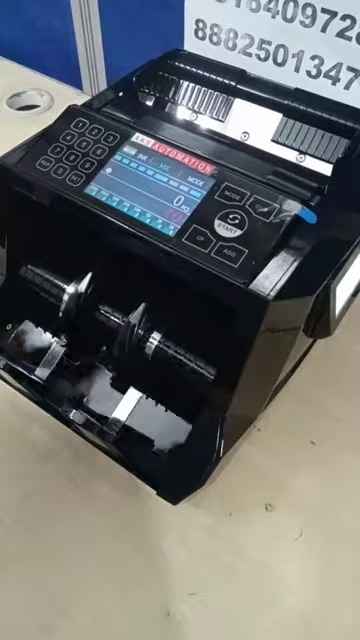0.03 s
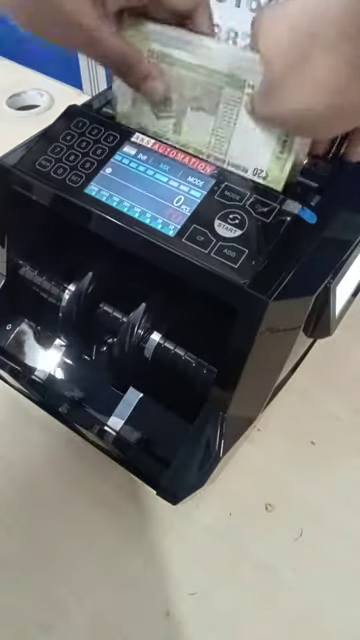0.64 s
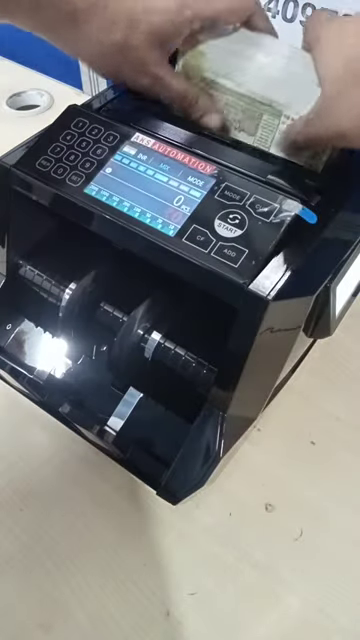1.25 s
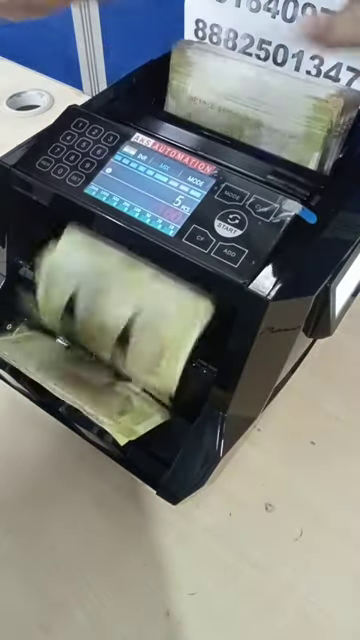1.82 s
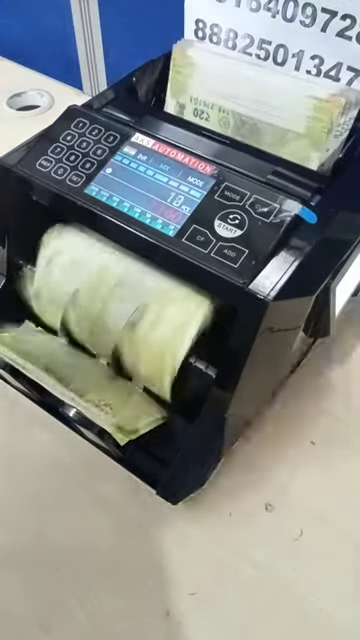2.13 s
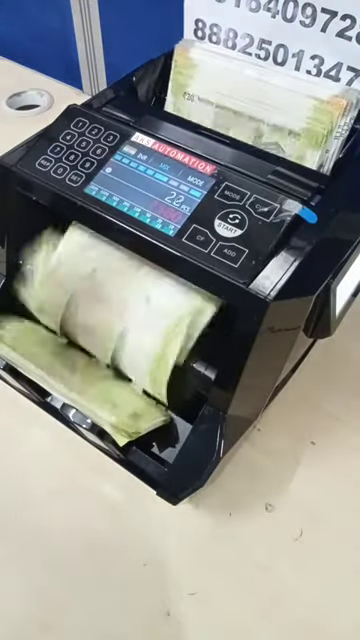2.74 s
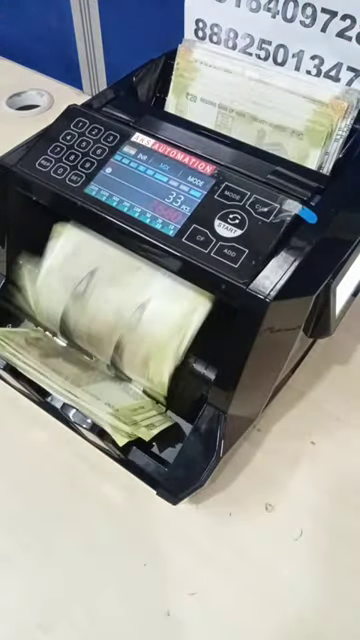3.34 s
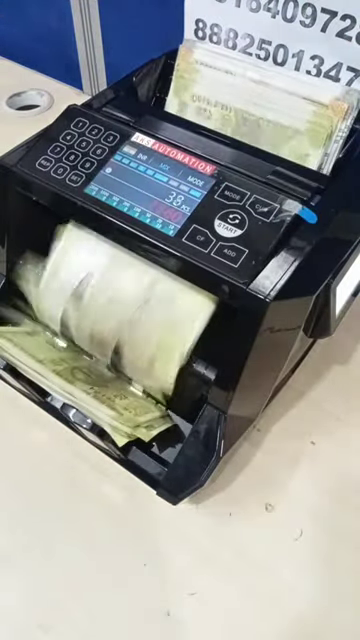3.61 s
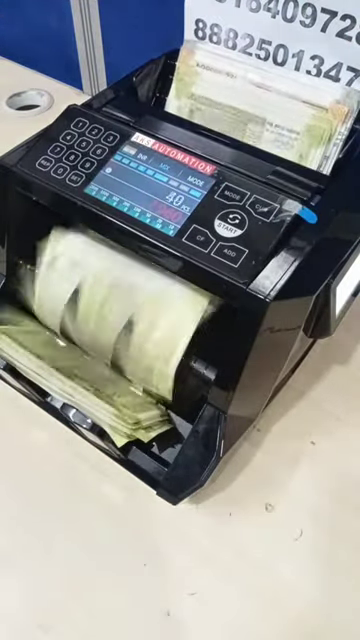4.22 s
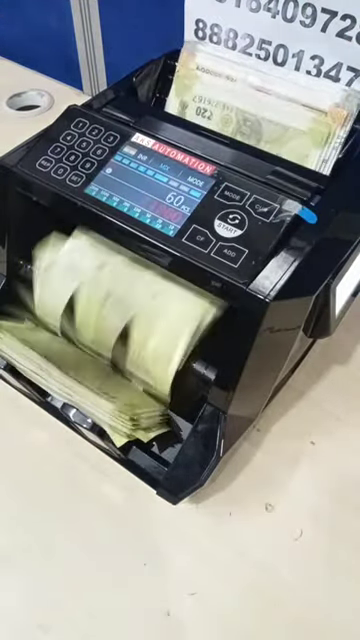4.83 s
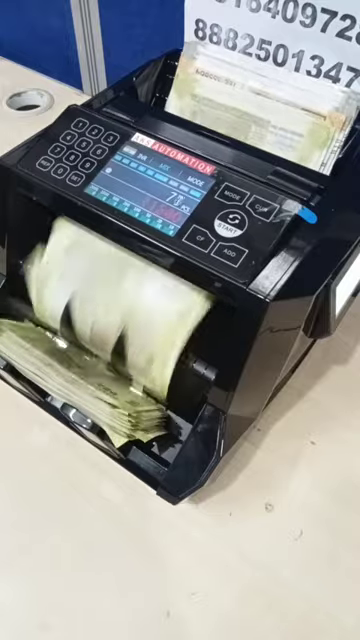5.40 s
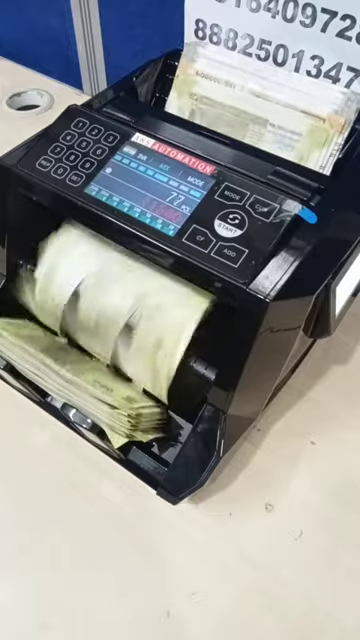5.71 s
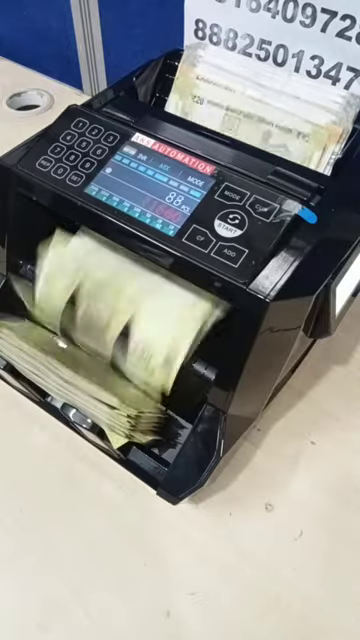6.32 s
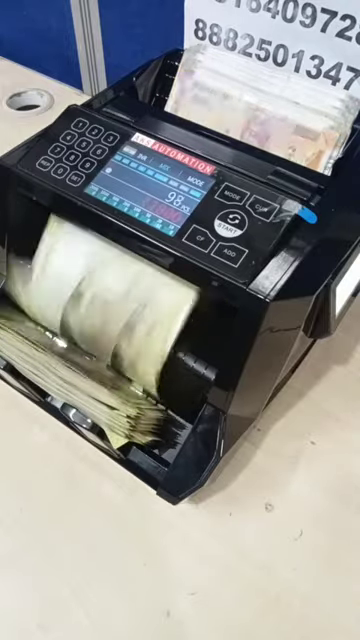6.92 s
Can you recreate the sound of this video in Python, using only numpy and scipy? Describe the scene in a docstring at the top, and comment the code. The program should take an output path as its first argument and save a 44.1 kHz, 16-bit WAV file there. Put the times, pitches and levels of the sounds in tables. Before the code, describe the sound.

Close to a banknote counter on a desk in a small office, fans rush softly. A bundle of notes knocks against the hopper and slides in with a faint rub. The motor starts with a short hiss and pulls the notes through in a rapid flutter of snaps and rustles, over a low hum and a rattling drive. It shudders at first, then runs evenly to the end.

```python
"""A small office, close to a banknote counter on the desk, with fans rushing softly in the room.
A bundle is knocked against the hopper and slid in; then the motor starts and pulls about 18 notes a second.
Each note snaps taut in the rollers, rustles along the path and slaps onto the stack, over mains hum
and the rattle of the drive. The full bundle shudders at first, then the feed runs on evenly."""
import sys
import numpy as np
from scipy import signal
from scipy.fft import rfft, irfft
from scipy.io import wavfile
from scipy.ndimage import uniform_filter1d

SR = 44100
rng = np.random.default_rng(int(sys.argv[2]) if len(sys.argv) > 2 else 0)


def unload_audio(sound):
    """Save the sound as a 16-bit wav file, at the path given as the first command line argument."""
    columns = np.transpose(np.atleast_2d(sound))
    # keep every value between -1 and 1, then stretch to whole-number steps
    steps = np.round(np.clip(columns, -1, 1) * 32767)
    wavfile.write(sys.argv[1], SR, steps.astype(np.int16))


N = 315756
TIME, FREQ = np.arange(N) / SR, np.fft.rfftfreq(16384, 1 / SR)
MAINS_HZ, FIRST_NOTE_S = 49.99, 1.707

# dark bed of fan noise: (frequency [Hz], relative level [dB])
AIR_EQ = [(25, -22), (60, -15), (95, -1), (160, -5.5), (230, -8), (350, -0.5), (540, -1), (800, -11),
          (1500, -16.5), (3200, -23.5), (7100, -22.5), (8800, -37.5), (12000, -46), (15000, -44)]
# fingers slide the bundle in: (peak time [s], level [dB], half length [s])
FINGER_STROKES = [(0.444, -62, .12), (0.65, -47, 0.035), (1.198, -47, 0.028), (1.25, -58, .025),
                  (1.386, -52, 0.053), (1.653, -48.5, 0.075)]
# paper rubbing on the hopper: (frequency [Hz], relative level [dB])
RUB_EQ = [(60, -29), (350, 1), (1000, 0.5), (2000, -2), (2700, -5), (3300, -7), (7000, -11.5), (8600, -31),
          (15000, -35)]
# the bundle knocks, later notes catch: (time [s], level [dB], decay [s], treble lift [dB])
HOPPER_KNOCKS = [(0.662, -20.5, 0.0062, -2), (0.669, -29, 0.0027, -3), (0.674, -19.5, 0.0064, -19),
                 (0.6765, -18, 0.0057, -11), (1.715, -20, 0.0062, -16), (1.726, -22, 0.0053, -8),
                 (3.065, -18, 0.0076, 5), (3.082, -20, 0.0039, 7), (3.086, -16, 0.0044, 0),
                 (3.098, -26.5, 0.0059, 5)]
# tone of a knock: (frequency [Hz], relative level [dB])
KNOCK_EQ = [(30, -35), (70, -27), (130, -4.5), (230, -14.5), (370, 5), (700, 0.5), (1050, 3), (1350, -0.5),
            (1900, -2.5), (2800, -2.5), (4500, -3), (7200, -2.5), (8600, -19), (15000, -34)]
# ring of the hopper: (frequency [Hz], relative level [dB], t60 [s])
HOPPER_MODES = [(159, 0, 0.14), (363, 1, 0.11), (474, 2.5, 0.091), (854, -1, 0.073), (1060, 3, 0.058),
                (1490, -12, .07), (1870, -1, 0.15), (1990, 0, 0.087), (2312, 6, 0.092), (2690, 6, .07),
                (3300, -13, 0.08), (4040, -7, 0.076)]
# swell of the scuff as the rollers spin up: (time [s], level [dB])
SCUFF_ENVELOPE = [(1.6, -100), (1.645, -46), (1.70, -42), (1.735, -23.5), (1.76, -48), (1.85, -100)]
# bright hiss of that scuff: (frequency [Hz], relative level [dB])
SCUFF_EQ = [(200, -14), (1500, 8), (3200, -27), (4500, 2), (7200, -1), (9000, -22), (12000, -20),
            (15000, -11)]
# feed speed, sagging as the stacker fills: (time [s], rate [notes/s])
FEED_RATE = [(1.7, 18.683), (2.55, 18.410), (2.9, 18.726), (4.6, 18.485), (5.1, 18.111), (5.7, 18.235),
             (7.0, 17.569)]
# the drive takes up the bundle, then runs evenly: (time [s], gain [dB])
DRIVE_LOAD = [(1.62, -60), (1.655, -4), (1.72, 1), (2.1, 1), (2.45, -5), (2.6, -.5), (7.16, -0.5)]
# rattle of belts and gears: (frequency [Hz], relative level [dB])
DRIVE_EQ = [(25, -20), (60, -36), (80, -49), (115, -14), (220, -9.5), (300, -1), (420, -6), (650, -7),
            (1000, -11.5), (2000, -14), (4000, -14), (7200, -10), (8600, -26), (15000, -28)]
# shaft tones: (frequency [multiple of the feed rate], level before the load gain [dB])
SHAFT_ORDERS = [(3, -67), (5, -52), (10, -54), (15.4, -52), (43.5, -58)]
# body resonances of case and desk: (frequency [Hz], width [Hz], lift [dB])
CASE_MODES = [(285, 44, 7.5), (353, 35, 6.5), (446, 13, 3), (523, 113, 9.5), (812.6, 18, 8), (890, 94, 8),
              (988, 79, 7), (1014, 23, -3.5), (1433, 130, 2), (1750, 170, 1), (2330, 330, 4),
              (2874, 140, 4.5), (3555, 75, 6), (4220, 150, 3.5), (6900, 350, 1.3)]
# the motor's hum swells, then settles: (time [s], level [dB])
HUM_ENVELOPE = [(1.68, -78), (1.73, -34), (1.9, -30), (2.4, -33), (3.4, -34), (4, -32.5), (6.2, -32),
                (7.16, -35.5)]
# swell and fade of the bundle's shudder: (time [s], level [dB])
SHUDDER_ENVELOPE = [(1.7, -66), (1.8, -30.5), (1.95, -34), (2.1, -33.5), (2.28, -31), (2.48, -32.5),
                    (2.6, -38.5), (3, -69)]
# hollow tone of that shudder: (frequency [Hz], relative level [dB])
SHUDDER_EQ = [(25, -44), (90, -11), (220, -12.5), (290, 4), (400, 4), (460, -22), (700, -5), (3000, -71)]
# the full bundle presses on the rollers until it loosens: (time [s], extra friction [dB])
BUNDLE_PRESSURE = [(1.7, 1.5), (2.15, 2.6), (2.33, 4.5), (2.56, -0.5), (3.2, -0.42), (7.16, -0.5)]
# notes that stick and come away with a harder snap: (time [s], snap gain [dB])
STICKING_NOTES = [(1.761, 9), (1.815, 6.5), (1.867, 6.5), (1.917, 7.5), (2.029, 7), (2.245, 7.5),
                  (2.299, 4), (2.409, 1.5), (2.515, 2.5), (2.571, 3), (5.381, 5.5)]
# crack of a note in the rollers: (frequency [Hz], relative level [dB])
SNAP_EQ = [(40, -36), (130, 3), (300, -7), (650, 3), (1000, 9), (1250, 2), (1650, 6.5), (2000, -12.5),
           (3000, -6.5), (5000, -1), (7300, -37), (8600, -61), (15000, -59)]
# ring of a taut note: (frequency [Hz], relative level [dB], decay [s])
TAUT_MODES = [(331, -7.5, 0.0055), (583, -6.5, 0.0051), (913, 0, 0.002), (1597, -6.5, 0.0014)]
# paper scraping along the path: (frequency [Hz], relative level [dB])
RUSTLE_EQ = [(100, -52), (500, -7.5), (1500, 1), (2800, -6.5), (4300, -1), (5800, -0.5), (6900, 2),
             (7600, -1), (8600, -15.5), (12000, -28), (15000, -20.5)]
# reverb tail of the room: (frequency [Hz], t60 [s])
ROOM_DECAY = [(150, 1), (600, 0.24), (2000, 0.36), (6000, 0.75), (14000, 0.93)]


def amp(db):
    """Decibels to gain."""
    return 10 ** (np.asarray(db) / 20)


def unit(x):
    """Scales to rms 1."""
    return x / np.sqrt(np.mean(x ** 2) + 1e-20)


def curve(rows):
    """Automation lane: straight lines between (time [s], value) rows."""
    return np.interp(TIME, *np.transpose(rows))


def at_hz(rows, hz=FREQ):
    """Reads (frequency [Hz], value) rows on a log-frequency axis."""
    row_hz, value = np.transpose(rows)
    return np.interp(np.log(hz + 1), np.log(row_hz + 1), value)


def colour(x, eq, lift_db=0):
    """Minimum-phase EQ of unit power gain: whatever rings does so after its cause."""
    gain = amp(at_hz(eq) + lift_db)
    mirrored = np.r_[gain, gain[-2:0:-1]]
    phase = -signal.hilbert(np.log(mirrored)).imag[:len(gain)]
    response = irfft(gain * np.exp(1j * phase))
    return signal.oaconvolve(x, response / np.linalg.norm(response))[:N]


def through_case(x, eq):
    """Colours a force with its own EQ and the resonances of the case."""
    lift_db = sum(db / (1 + (2 * (FREQ - hz) / width) ** 2) for hz, width, db in CASE_MODES)
    return colour(x, eq, lift_db)


def wander(hz):
    """Random modulation of rms 1, moving at rates up to about hz."""
    t = TIME[::SR // 2000]
    rolloff = 1 + (np.fft.rfftfreq(len(t), t[1]) / hz) ** 4
    slow = irfft(rfft(rng.standard_normal(len(t))) / rolloff, len(t))
    return np.interp(TIME, t, unit(slow))


def random_signs(count=N):
    """White noise made of +1 and -1."""
    return rng.choice([-1., 1.], count)


def crackle(per_s, spread_db):
    """Tiny slips and crinkles of unequal size, rms 1."""
    size = amp(spread_db * np.minimum(rng.exponential(1, N), 4))
    return unit(size * random_signs() * (rng.random(N) < per_s / SR))


def bursts(times, gains, decay, rise):
    """Envelope of hits with a fast attack and an exponential tail; times in seconds."""
    starts = np.round(np.maximum(times, 0) * SR).astype(int)
    hits = np.bincount(starts, gains, N)[:N]
    t = TIME[:SR // 5]
    return signal.oaconvolve(hits, (1 - np.exp(-t / rise)) * np.exp(-t / decay))[:N]


def fans(level_db=-40, waver_db=1.9):
    """Fans keep up a soft, slightly uneven rush of air."""
    return amp(level_db + waver_db * wander(6.6)) * colour(rng.standard_normal(N), AIR_EQ)


def handling(contact_db=-53):
    """The bundle rubs on the hopper walls, swelling with each stroke of the fingers."""
    strokes = sum(amp(db) * np.exp(-((TIME - peak) / half) ** 2) for peak, db, half in FINGER_STROKES)
    return (amp(contact_db) + strokes) * colour(crackle(3500, 1.2), RUB_EQ)


def hopper_knocks(ring_db=-13.02, rattle_db=-17, rattle_decay=0.048):
    """Paper edges knock on the hopper, which rings and rattles on; crisper hits carry more treble."""
    noise = random_signs()
    dull = signal.lfilter(*signal.butter(1, 2500, fs=SR), noise)
    treble = noise - dull
    times, levels_db, _, _ = np.transpose(HOPPER_KNOCKS)
    force = bursts(times, amp(levels_db + rattle_db), rattle_decay, rise=0.0095) * dull
    for at, db, decay, treble_db in HOPPER_KNOCKS:
        force += bursts([at], [amp(db)], decay, rise=0.0011) * (dull + amp(treble_db) * treble)
    knocks = colour(force, KNOCK_EQ)
    t = TIME[:SR // 4]
    ring = sum(amp(db - 60 * t / t60) * np.sin(2 * np.pi * hz * t) for hz, db, t60 in HOPPER_MODES)
    return knocks + amp(ring_db) * signal.oaconvolve(knocks, ring / np.linalg.norm(ring))[:N]


def roller_scuff():
    """The rollers spin up against the bottom note with a bright hiss."""
    return amp(curve(SCUFF_ENVELOPE)) * colour(crackle(9000, 2), SCUFF_EQ)


def feed_turns():
    """Turns of the feed roller since the first note; one turn pulls one note."""
    turns = np.cumsum(curve(FEED_RATE)) / SR
    return turns - np.interp(FIRST_NOTE_S, TIME, turns)


def drive(rattle_db=-34.5, flutter_db=2.5, waver=0.25, slip_rad=0.35):
    """Belts and gears rattle under load; the shafts shake the case at multiples of the feed rate."""
    rattle = through_case(crackle(3000, 3) * amp(flutter_db * wander(35)), DRIVE_EQ)
    turns = feed_turns()
    shafts = np.zeros(N)
    for order, db in SHAFT_ORDERS:
        gain = np.sqrt(2) * amp(db) * (1 + waver * wander(3.2))
        shafts += gain * np.sin(2 * np.pi * order * turns + slip_rad * wander(11))
    return amp(curve(DRIVE_LOAD)) * (amp(rattle_db) * rattle + shafts)


def motor_hum(waver_db=0.5, sway_rad=0.072):
    """The motor's iron hums at twice the mains frequency."""
    tone = np.sqrt(2) * np.sin(2 * np.pi * 2 * MAINS_HZ * TIME + sway_rad * wander(5.6))
    return amp(curve(HUM_ENVELOPE) + waver_db * wander(18)) * tone


def bundle_shudder():
    """The bundle shudders on the feed roller: a hollow drone that fades as the load gets lighter."""
    return amp(curve(SHUDDER_ENVELOPE)) * colour(rng.standard_normal(N), SHUDDER_EQ)


def note_cues(jitter_s=0.00079, friction_share=0.32, sag_db_per_s=0.3):
    """One note a turn, each a little different: times [s], snap gains [dB] and rustle gains [dB]."""
    turns = feed_turns()
    count = np.arange(int(turns[-1]) + 1)
    late, crisp, coarse = rng.standard_normal((len(count), 3)).T
    times = np.interp(count, turns, TIME) + jitter_s * late
    friction_db = np.interp(times, *np.transpose(BUNDLE_PRESSURE))
    pull_db = friction_share * friction_db - sag_db_per_s * (times - FIRST_NOTE_S) + 1.4 * crisp
    for at, db in STICKING_NOTES:
        nearest = np.argmin(abs(times - at))
        times[nearest], pull_db[nearest] = at, db
    return times, pull_db, friction_db + 0.5 * coarse


def note_snaps(times, pull_db, level_db=-22.5, pop_db=-24, grip_db=-5, land_db=-7, decay=0.0038):
    """Each note is gripped, snaps taut between the rollers, then slaps the stacker."""
    grip_size, land_size, late = rng.standard_normal((len(times), 3)).T
    force = amp(pull_db)
    grip = bursts(times - 0.00453, force * amp(grip_db + grip_size), decay, rise=0.00064)
    snap = bursts(times - 0.0006, force, decay, rise=0.00056)
    land_times = times + 0.0179 + 0.00295 * late
    slap = bursts(land_times, force * amp(land_db + 2 * land_size), decay=0.0054, rise=0.00089)
    cracks = through_case((grip + snap + slap) * random_signs(), SNAP_EQ)
    return amp(level_db) * cracks + amp(pop_db) * taut_pops(times - 0.0005, force)


def taut_pops(times, force, pitch_spread=0.11, rise=0.0019):
    """A note pulled taut rings for a few cycles: a round pop, pitched a little differently each time."""
    pops, t = np.zeros(N + SR), TIME[:SR // 30]
    attack = 1 - np.exp(-t / rise)
    detunes = 1 + pitch_spread * rng.standard_normal((len(times), len(TAUT_MODES)))
    for start, gain, ratios in zip(np.round(times * SR).astype(int), force, detunes):
        for (hz, db, decay), ratio in zip(TAUT_MODES, ratios):
            envelope = gain * amp(db) * attack * np.exp(-t / decay)
            pops[start:start + len(t)] += envelope * np.sin(2 * np.pi * hz * ratio * t)
    return pops[:N]


def paper_flex(x, depth_db):
    """Flexing paper changes colour from moment to moment; rms 1."""
    spectra = signal.stft(x, nperseg=256, noverlap=192)[2]
    patches = uniform_filter1d(rng.standard_normal(spectra.shape), size=3, axis=0)  # across frequency
    patches = uniform_filter1d(patches, size=14, axis=1)  # across time
    flexed = signal.istft(spectra * amp(depth_db * unit(patches)), nperseg=256, noverlap=192)[1]
    return unit(flexed[:N])


def note_rustle(times, rustle_db, level_db=-33, peel_db=-6, drag_db=-5, flutter_db=1.18):
    """Paper drags on the rollers and each note scrapes along the path; midway the next one peels off."""
    late, size = rng.standard_normal((len(times), 2)).T
    scrape = bursts(times - 0.0056, amp(1.73 * rustle_db), decay=0.037, rise=0.0022)
    peel_times = times + 0.0298 + 0.0012 * late
    peel = bursts(peel_times, amp(peel_db + rustle_db + 2 * size), decay=0.007, rise=0.00069)
    drag = amp(drag_db + curve(DRIVE_LOAD))
    fibres = paper_flex(crackle(14000, 2.4), depth_db=3)
    envelope = (scrape + peel + drag) * amp(flutter_db * wander(90))
    return amp(level_db) * through_case(envelope * fibres, RUSTLE_EQ)


def room(x, wet_db=-5):
    """Sparse reflections off desk and partitions; each band dies away at its own speed."""
    slots = np.arange(200, SR // 2, 20)  # one reflection in every 20 samples
    taps = np.zeros(SR)
    taps[slots + rng.integers(0, 20, len(slots))] = random_signs(len(slots))
    hz, t, spectra = signal.stft(taps, SR, nperseg=256)
    t60 = at_hz(ROOM_DECAY, hz)[:, None]
    tail = signal.istft(spectra * amp(-60 * t / t60), SR)[1]
    return x + amp(wet_db) * signal.fftconvolve(x, tail / np.linalg.norm(tail))[:N]


def scene():
    """Mono mix: paper and drive go through the room, over a dry bed of hum and fans."""
    times, pull_db, rustle_db = note_cues()
    notes = note_snaps(times, pull_db) + note_rustle(times, rustle_db)
    bundle = roller_scuff() + bundle_shudder() + hopper_knocks() + handling()
    return (room(notes + bundle + drive()) + motor_hum() + fans())[None]


def record(dry, start_s=0.12, fade_s=0.28, cutoff_hz=15470):
    """Fades the mix in and trims the top end with a steep low-pass."""
    fade_in = np.clip((TIME - start_s) / fade_s, 0, 1) ** 0.91
    lowpass = signal.firwin(801, cutoff_hz, window=("kaiser", 9), fs=SR)
    return signal.oaconvolve(dry * fade_in, lowpass[None], "same")


dry = scene()
out = record(dry)
unload_audio(out)
```